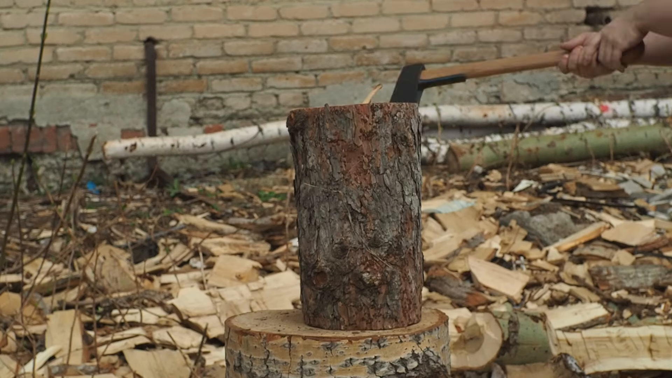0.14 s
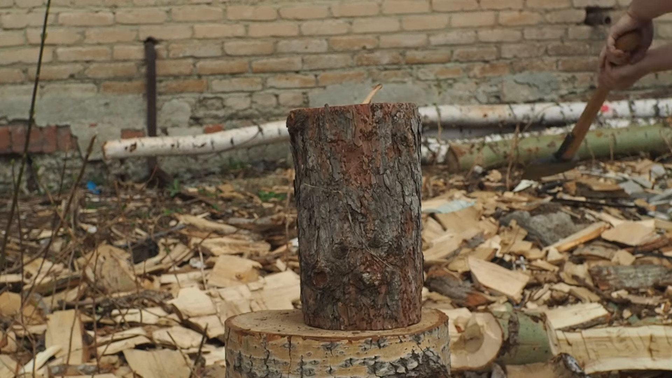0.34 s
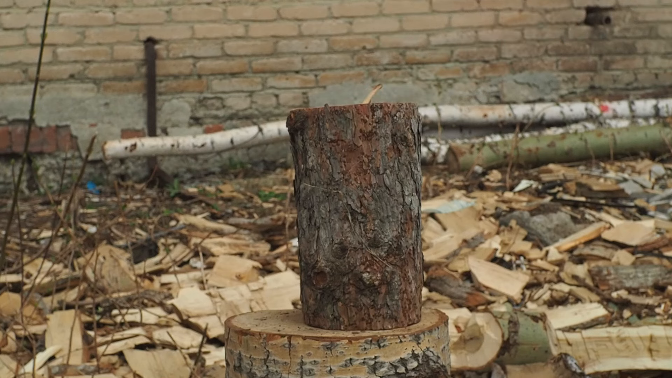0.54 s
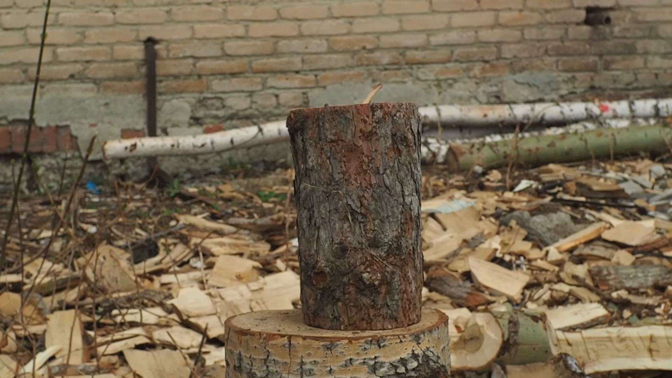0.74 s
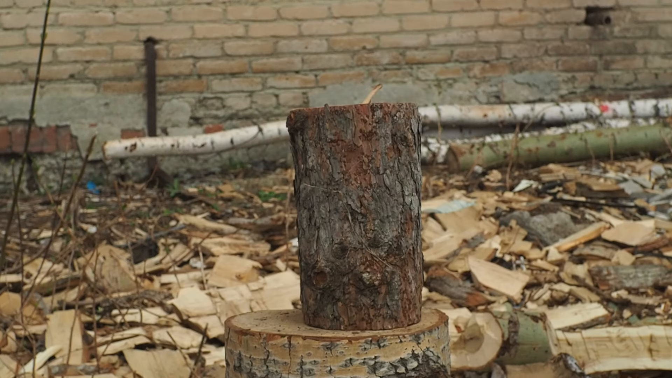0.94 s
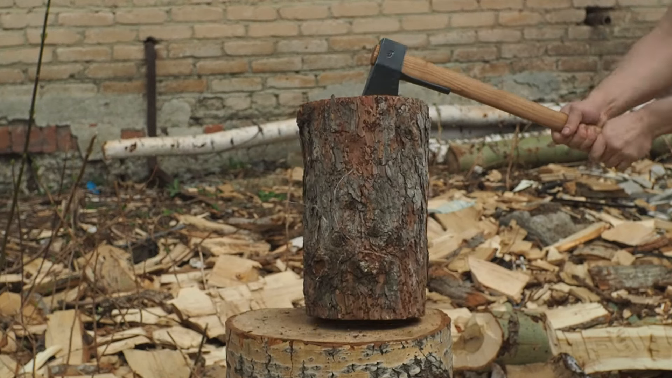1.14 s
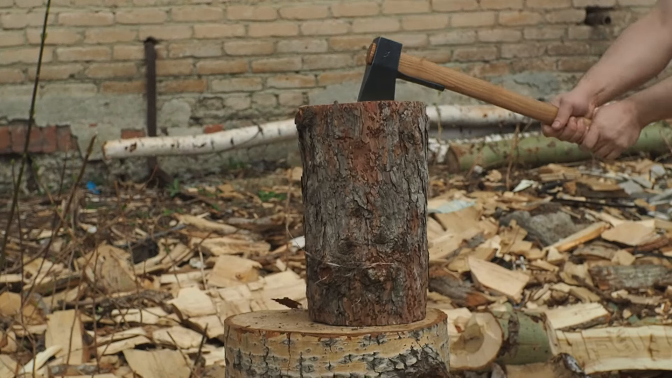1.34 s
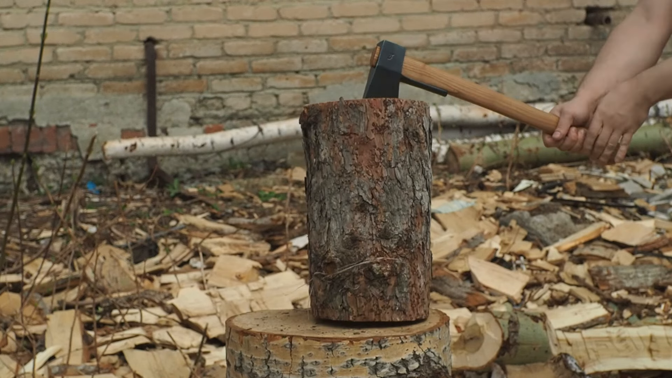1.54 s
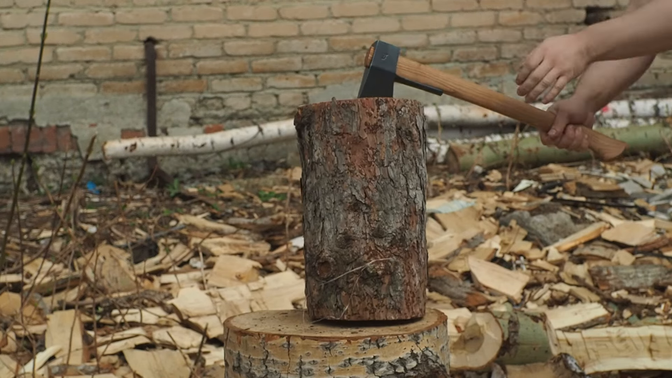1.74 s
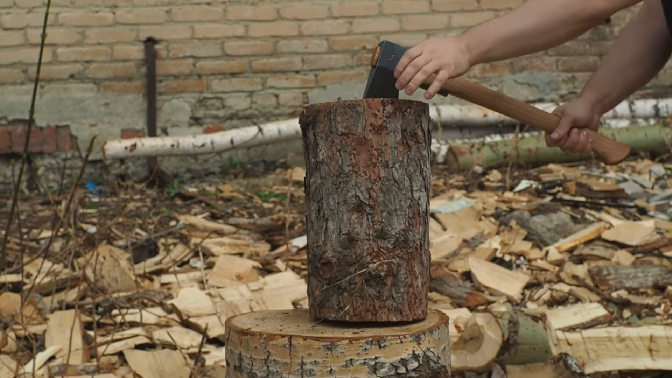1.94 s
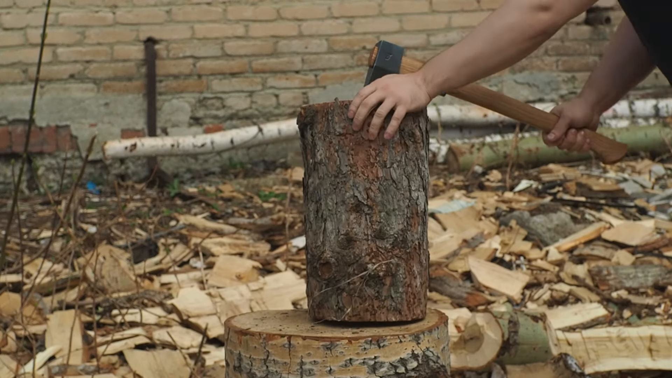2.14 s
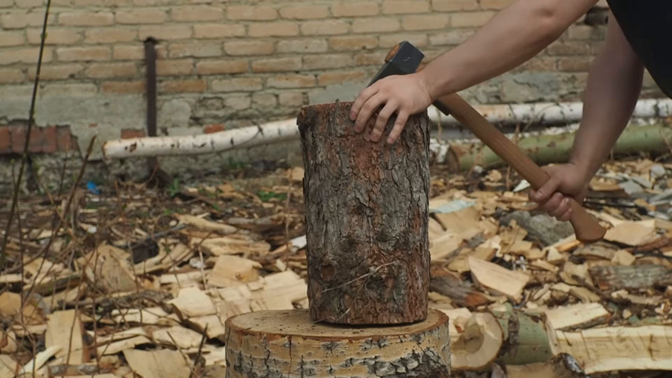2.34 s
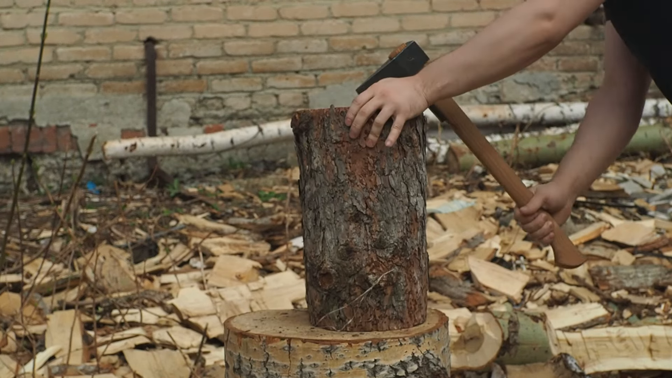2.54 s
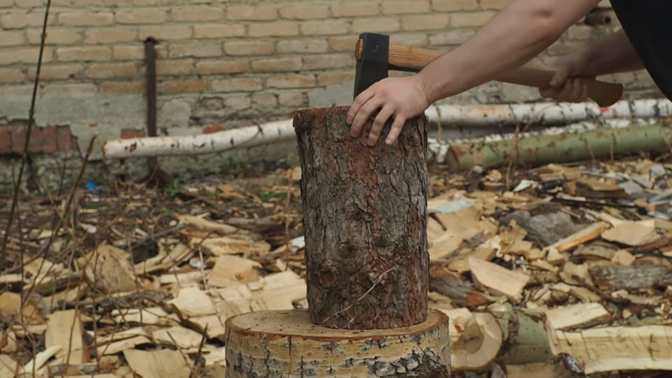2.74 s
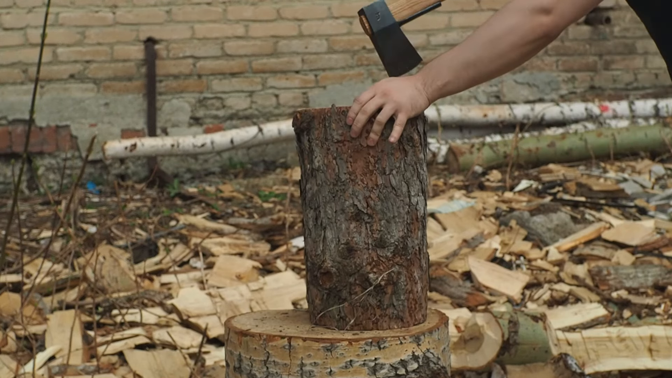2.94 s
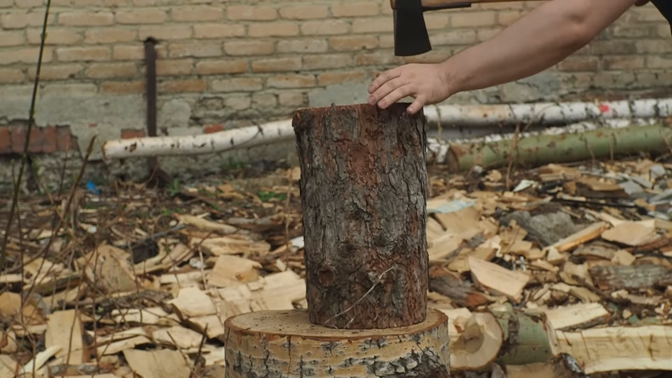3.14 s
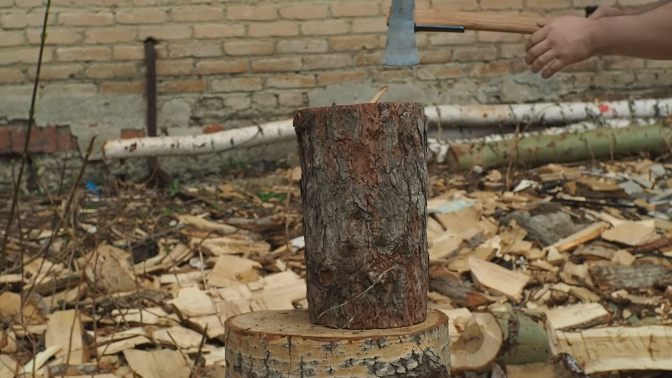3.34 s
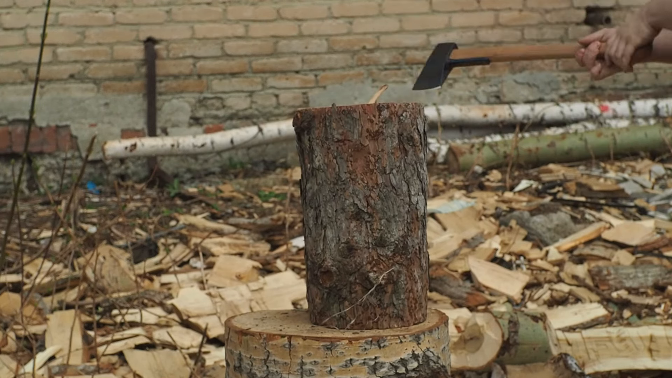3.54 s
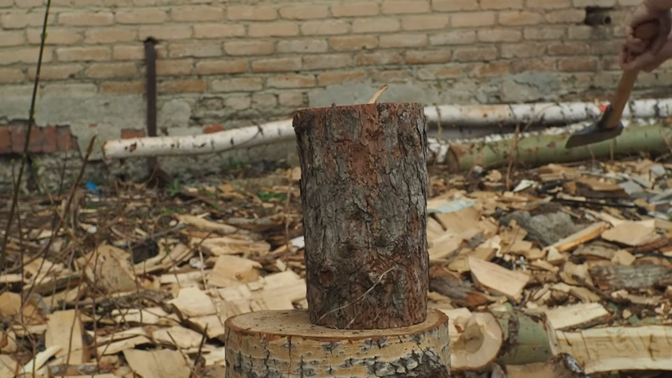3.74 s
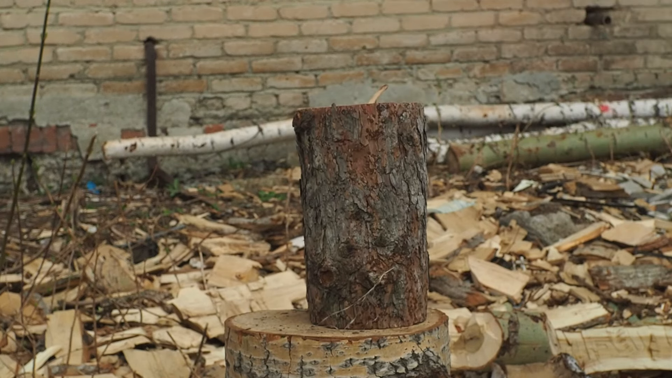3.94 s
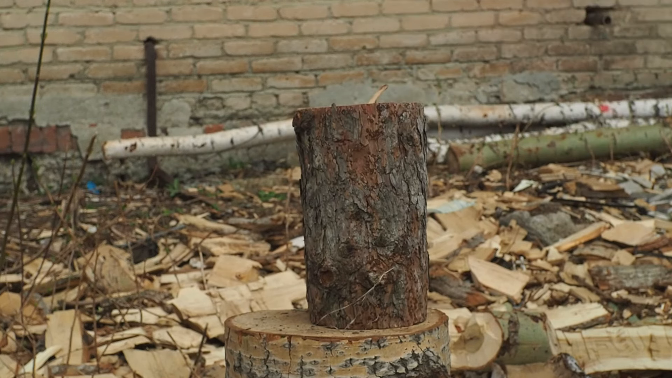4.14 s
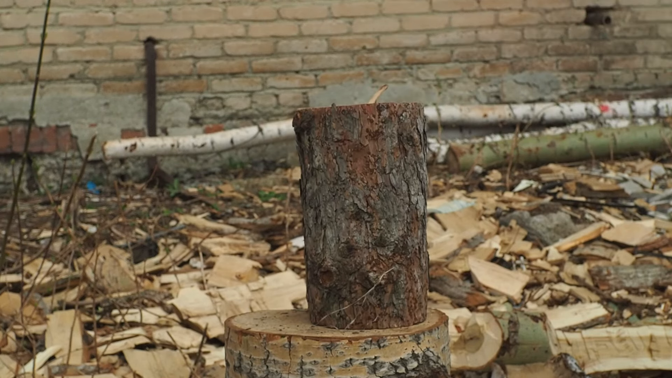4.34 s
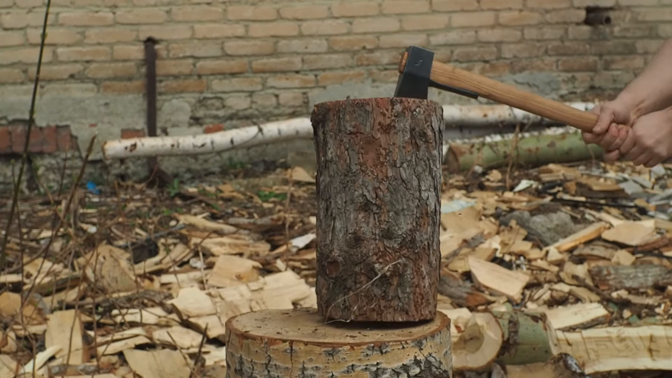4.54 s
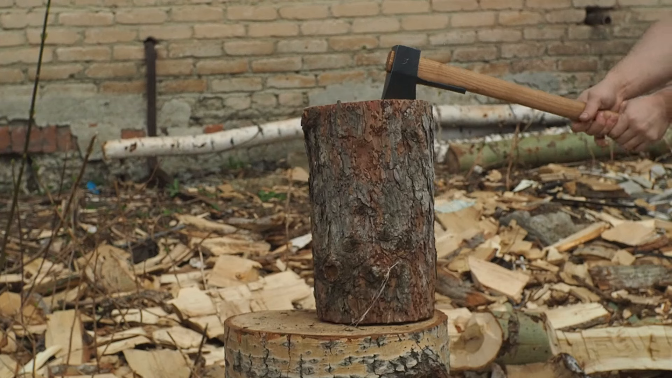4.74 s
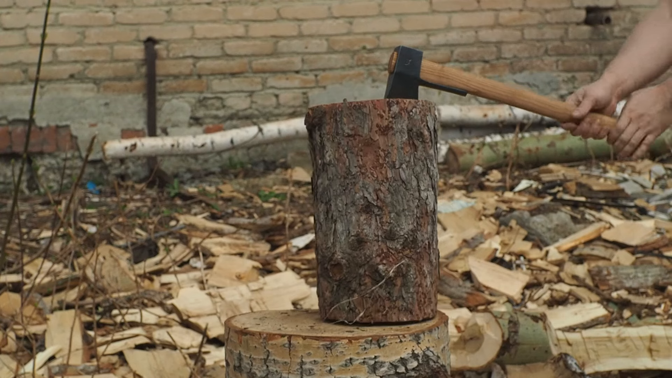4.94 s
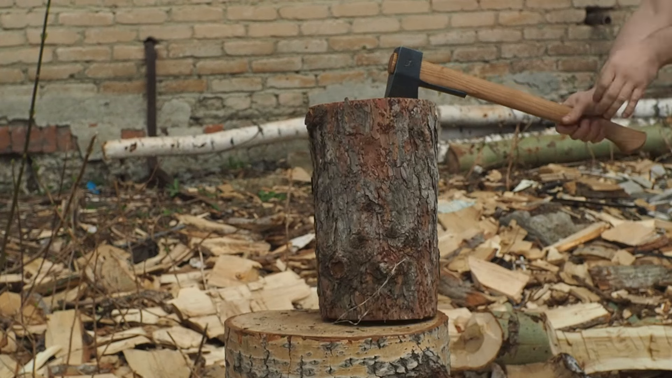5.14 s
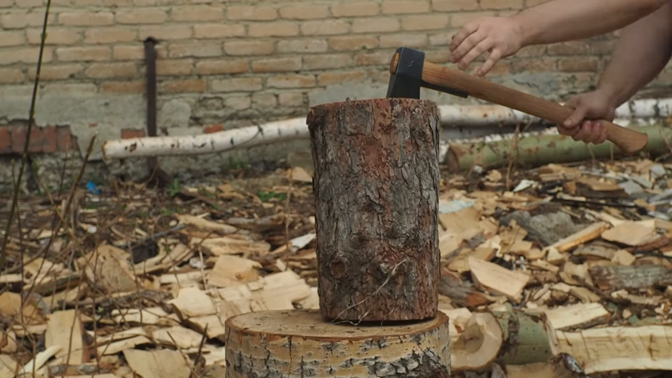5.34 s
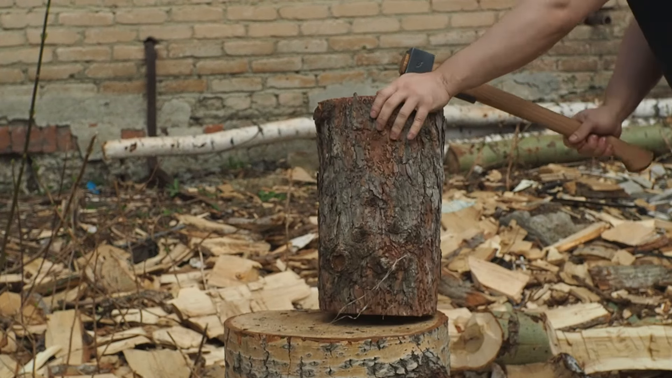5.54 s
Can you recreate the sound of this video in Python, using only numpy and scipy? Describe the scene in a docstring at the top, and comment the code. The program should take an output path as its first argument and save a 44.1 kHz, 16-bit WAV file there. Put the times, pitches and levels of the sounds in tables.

```python
"""A heavy axe bites twice into a log on a chopping block, in a yard between brick walls.
Each blow cracks fibres and makes the log ring; the walls throw the sound to and fro as a quick echo.
In between, boots shuffle on wood chips, hands work the axe loose and the log knocks on the block.
Far away a town rumbles and an engine drones, swelling as it pulls and then easing off."""
import sys
import numpy as np
from scipy import signal
from scipy.fft import rfft, irfft, next_fast_len
from scipy.io import wavfile

SR = 44100
rng = np.random.default_rng(int(sys.argv[2]) if len(sys.argv) > 2 else 0)


def file_out(sig):
    """Save sig as 16-bit WAV at sys.argv[1]."""
    # one column per channel
    cols = np.atleast_2d(sig).T
    # limit, then scale
    lim = np.clip(cols, -1, 1)
    pcm = np.round(lim * 32767).astype(np.int16)
    wavfile.write(sys.argv[1], SR, pcm)


N = 246518
T = np.arange(N) / SR
SHORT, LONG = T[:SR // 4], T[:SR]  # clocks for sounds of a quarter second and of one second

# Axe blows: (time [s], ring gain [dB], crack level [dB], splitting time [s], crack tilt [dB/octave],
# wall echo gain [dB], yard tail gain [dB], far echo gain [dB], its pitch [Hz], its width [octaves])
AXE_BLOWS = [(1.1028, 2, -7, 0.003, -1, 1, 21.5, 18, 960, 0.34),
             (4.481, -1, -7.5, 0.0043, -0.6, 1, 21, 18.5, 1037, 0.18)]
# Notes of the log and axe head; where the axe lands sets their strength. A fade time is a 60 dB fall.
# (pitch [Hz], fade time [s], level in first blow [dB], level in second blow [dB])
LOG_NOTES = [(111.5, 0.095, -27, -20), (157, 0.054, -17.5, -15), (188, 0.058, -21, -12),
             (311, 0.046, -15.5, -15), (397, 0.056, -14, -21), (441, 0.041, -11.5, -10.5),
             (536.4, 0.097, -17, -6.5), (727, 0.059, -31, -19), (813, 0.063, -13, -29),
             (906, 0.065, -14.5, -47), (1060, 0.014, -21.5, -14), (1120, 0.11, -23.5, -42),
             (1385, 0.063, -17.5, -23), (1614, 0.02, -17, -11.5), (1990, 0.03, -40, -10.5),
             (2126, 0.022, -16.5, -17), (2610, 0.03, -14.5, -36), (3000, 0.02, -8.5, -42),
             (3280, 0.047, -14.5, -41), (3660, 0.032, -16, -29), (4260, 0.039, -35, -15.5),
             (4830, 0.065, -34, -21), (6200, .035, -16, -39)]
# Tone of tearing fibres: (frequency [Hz], relative level [dB])
CRACK_TONE = [(100, -17), (500, -11.5), (900, 0), (1700, -6.5), (2500, -5.5), (4000, -3), (7300, -5),
              (9000, -6.5), (11500, -15), (13500, -6.5), (16000, -25)]
# The last fibres snap, once in each blow: (delay [s], level [dB], pitch [Hz])
FIBRE_SNAPS = [(.0008, -2.5, 7000), (.0035, -3, 14000)]
# Echoes between the facing walls: (delay [s], gain [dB], treble cut-off [Hz], boxy ring gain [dB])
WALL_ECHOES = [(.0258, -9, 7900, -6), (.0508, -16, 4500, 13.5), (.0778, -18.5, 4030, -1),
               (.105, -27, 4000, -2)]
# Sound scattered around the yard: (frequency [Hz], gain [dB], fade time [s])
YARD_BANDS = [(104, 0, 0.2), (302, 1.5, 0.57), (550, -5.5, 1), (1000, 3.5, 0.32), (2000, -5.5, 0.63),
              (4000, -5.5, 0.51), (7980, -10.5, 0.3), (14000, -36, 0.13)]
# Light knocks of the handle and loose wood: (time [s], level [dB], pitch [Hz], width [octaves])
WOOD_KNOCKS = [(.057, -24, 720, 0.37), (0.424, -31, 2870, 0.46), (.598, -23.5, 940, .45),
               (.602, -21.5, 2480, 0.59), (1.7, -23, 1810, 0.59), (2.144, -28.5, 1980, 1.05),
               (2.25, -27.5, 1400, 1.5), (2.271, -28, 850, 1.2), (3.401, -32.5, 1040, 1.1),
               (5.283, -30, 910, 0.36), (5.343, -24.5, 1210, 1.4), (5.425, -23.5, 1150, 0.37),
               (5.561, -27.5, 990, 0.6)]
# A boot or hand lands: (time [s], thud level [dB], scuff level [dB], scuff pitch [Hz], fade time [s])
SOFT_LANDINGS = [(.511, -29, -28.5, 1000, .07), (1.898, -25.5, -20.5, 1040, 0.084),
                 (3.8365, -27.5, -20.5, 1990, 0.037), (3.903, -21.5, -28.5, 1400, 0.058)]
# The loudest snaps of dry chips and bark: (time [s], level [dB], pitch [Hz])
LOUD_SNAPS = [(.191, -29, 6000), (0.602, -16.5, 9500), (1.4443, -26, 5750), (1.687, -27, 7200),
              (1.933, -24.5, 4400), (2.379, -25, 10000), (3.105, -25, 8700), (3.892, -23.5, 3870),
              (4.818, -26.5, 7950), (5.23, -29, 7000), (5.246, -25, 7000), (5.2856, -23, 10000)]
# Boots on chips, sleeves and hands on bark: (time [s], rise [s], fall [s], level [dB], tilt [dB/octave])
SHUFFLE_MOVES = [(.16, 0.071, 0.065, -38, 1), (.48, .11, .05, -42, 3.5), (1.31, 0.026, 0.043, -42.5, 0.5),
                 (1.54, 0.04, .045, -42, 3), (1.84, 0.063, 0.062, -37.5, 3), (2.1, 0.13, .13, -37, 2.5),
                 (3.08, .03, 0.022, -49, 3), (3.53, .06, .03, -41.5, 2), (3.88, 0.028, 0.052, -44, 2.5),
                 (4.87, 0.066, .1, -46, 4.5), (5.223, .008, 0.13, -37, 3), (5.51, 0.041, 0.048, -43, 4)]
# Tone of sliding chips: (frequency [Hz], relative level [dB])
CHIP_TONE = [(150, -9), (500, 2.5), (1000, 4.5), (2000, 1), (4000, -2.5), (7000, -9), (11500, -12),
             (14000, -8.5), (16000, -31)]
# Tone of the steady background: the distant town, plus a faint hiss near 13.5 kHz: (frequency [Hz], relative
# level [dB])
TOWN_TONE = [(22, -27), (50, -10), (130, -4), (245, -17.5), (315, -11.5), (420, -16.5), (530, -12.5),
             (620, -19), (1050, -15), (2300, -30), (3800, -29), (6500, -35.5), (12400, -37), (13500, -35)]
# How alike the town sounds on the left and right: (frequency [Hz], likeness [0 to 1])
TOWN_STEREO = [(30, 0.81), (130, 0.87), (290, 0.88), (640, 0.84), (1410, 0.46), (3100, 0), (15000, 0)]
# How much louder the left side is than the right: (frequency [Hz], left minus right [dB])
SIDE_BALANCE = [(25, -1), (60, 1), (200, 1.1), (1000, 1.5), (4400, -0.4), (8100, 4.5), (11000, 0),
                (14000, -8)]

SNAP_HZ = 6900  # typical pitch of a breaking splinter


def axe():
    """Each blow chops and snaps the last fibres; the walls, the yard and a far echo answer."""
    out = np.zeros((2, N))
    for blow, (start, *stroke, walls_db, yard_db, far_db, far_hz, far_octaves) in enumerate(AXE_BLOWS):
        delay, fibre_db, fibre_hz = FIBRE_SNAPS[blow]
        add(out, start, chop(blow, *stroke))
        fibres = burst(hump(fibre_hz, octaves=0.55), fade_s=0.014, likeness=0.3)
        add(out, start + delay, undb(fibre_db) * fibres)
        add(out, start, undb(walls_db) * wall_echoes(blow, stroke))
        add(out, start, undb(yard_db) * yard_tail())
        add(out, start, undb(far_db) * far_echo(far_hz, far_octaves))
    return out


def chop(blow, ring_db, crack_db, split_s, tilt_db, rise_s=0.00026):
    """The blade tears fibres until it sticks; the log rings on."""
    ring = sum((-1) ** k * undb(levels[blow]) * np.sin(2 * np.pi * hz * SHORT) * fade(SHORT, fade_s)
               for k, (hz, fade_s, *levels) in enumerate(LOG_NOTES))
    onset = 1 - np.exp(-SHORT / rise_s)
    tearing = fade(np.maximum(SHORT - split_s, 0), fade_s=0.016)
    crack = unit(colour(stereo_noise(len(SHORT), 0.64), sloped(CRACK_TONE, tilt_db)))
    return undb(ring_db) * ring * onset + undb(crack_db) * crack * tearing


def wall_echoes(blow, stroke, bass_cut_hz=650, boxy_hz=1060):
    """The blow bounces between the walls and comes back thinner, duller and boxier."""
    out = np.zeros((2, SR))
    bass_loss = signal.butter(2, bass_cut_hz, "high", fs=SR, output="sos")
    for delay, db, top_hz, boxy_db in WALL_ECHOES:
        treble_loss = signal.butter(1, top_hz, fs=SR, output="sos")
        echo = signal.sosfilt(np.vstack([bass_loss, treble_loss]), chop(blow, *stroke))
        boxy = signal.lfilter(*signal.iirpeak(boxy_hz, Q=7, fs=SR), echo)
        add(out, delay, undb(db) * (echo + undb(boxy_db) * boxy))
    return out


def yard_tail(rise_s=0.0041):
    """Sound scatters around the yard, and each octave dies away at its own pace."""
    out = np.zeros((2, SR))
    for hz in 125 * 2. ** np.arange(8):
        fade_s = lookup(YARD_BANDS, hz, column=2)
        noise = stereo_noise(SR, likeness=np.clip(1.1 - hz / 3500, 0.15, 0.9))
        band = colour(noise, lambda f: np.sqrt(np.maximum(1 - abs(np.log2(f / hz)), 0)))
        same_energy = np.sqrt(2 * np.log(1000) / fade_s / SR)  # a longer fade adds no energy
        gain = undb(lookup(YARD_BANDS, hz)) * same_energy
        out += gain * band * grains(SR, spread_db=2.4) * fade(LONG, fade_s)
    return out * (1 - np.exp(-LONG / rise_s))


def far_echo(hz, octaves, middle_s=0.25, spread_s=0.12, round_trip_s=0.052):
    """The middle pitches come back late from walls further off, throbbing once per round trip."""
    swell = np.exp(-((LONG - middle_s) / spread_s) ** 2 / 2)
    throb = np.exp(0.39 * np.cos(2 * np.pi * LONG / round_trip_s))
    return colour(stereo_noise(SR, 0.88), hump(hz, octaves)) * unit(swell * throb) / np.sqrt(SR)


def knocks(click_db=-11.5):
    """Wood clicks on wood: a narrow knock rings one clear note, a wide one is a longer scuff."""
    out = np.zeros((2, N))
    for start, db, hz, octaves in WOOD_KNOCKS:
        fade_s = (0.021 + 0.035 * octaves) * (1000 / hz) ** 0.3  # higher pieces die away sooner
        note_gain = undb(-7) * np.exp(-octaves)
        note = note_gain * np.sin(2 * np.pi * hz * SHORT) * fade(SHORT, fade_s)
        body = burst(hump(hz, octaves), fade_s, likeness=0.84)
        click = undb(click_db) * snap(SNAP_HZ)
        add(out, start, undb(db) * (body + note + click))
    return out


def thuds():
    """A soft weight lands on wood: a low thump under a broad scuff."""
    out = np.zeros((2, N))
    for start, thud_db, scuff_db, scuff_hz, fade_s in SOFT_LANDINGS:
        add(out, start, undb(thud_db) * burst(hump(hz=375, octaves=0.49), fade_s, likeness=0.96))
        add(out, start, undb(scuff_db) * burst(hump(scuff_hz, octaves=1.42), fade_s, likeness=0.7))
    return out


def splinters():
    """Dry bark and chips break, in loud single snaps and in little clusters."""
    out = sprinkle(start=1.8, length_s=0.45, db=-36.5, count=4)  # bark ticks under a steadying hand
    for start, db, hz in LOUD_SNAPS:
        add(out, start, undb(db) * snap(hz))
    for start, *_ in AXE_BLOWS:  # crumbs of bark, shaken loose, fall back
        out += sprinkle(start + 0.12, length_s=0.13, db=-31.5, count=4)
    for start, rise, fall, db, _ in SHUFFLE_MOVES:  # trodden chips give way
        out += sprinkle(start + rise / 2, rise / 2 + fall, db + 3.5, count=2)
    return out


def sprinkle(start, length_s, db, count, spread_db=5, spread_octaves=0.49):
    """A few small snaps come at chance moments, each with its own size and pitch."""
    out = np.zeros((2, N))
    for k, (size, pitch) in enumerate(rng.standard_normal((count, 2))):
        moment = start + length_s * (k + rng.random()) / count
        hz = SNAP_HZ * 2 ** (spread_octaves * pitch)
        add(out, moment, undb(db + spread_db * size) * snap(hz))
    return out


def snap(hz):
    """One dry splinter breaks."""
    return burst(hump(hz, octaves=0.72), fade_s=0.013, likeness=0.27)


def shuffles():
    """Chips slide over each other in a dense crackle that swells and dies with each move."""
    out = np.zeros((2, N))
    for start, rise, fall, db, tilt_db in SHUFFLE_MOVES:
        grit = stereo_noise(SR, 0.4) * grains(SR, spread_db=3)
        crackle = unit(colour(grit, sloped(CHIP_TONE, tilt_db)))
        swell = np.minimum(LONG / rise, 1)
        settle = np.exp(-(np.maximum(LONG - rise, 0) / fall) ** 1.01)
        add(out, start, undb(db) * crackle * swell * settle)
    return out


def town(level_db=-43):
    """The far-off town is a steady wash of noise, much alike on both sides in the bass."""
    def wash(sign):
        share = lambda f: np.sqrt(1 + sign * lookup(TOWN_STEREO, f))
        return colour(rng.standard_normal(N), lambda f: sloped(TOWN_TONE)(f) * share(f))

    shared, side = wash(1), wash(-1)
    return undb(level_db) * unit(shared + np.array([side, -side]))


def engine(firing_hz=118.9, pull_at_s=3.63, ease_at_s=3.97):
    """A far-off engine fires with a wavering hum and a rumble, louder as it pulls, softer as it eases."""
    pull = np.exp(-((T - pull_at_s) / 0.43) ** 2)
    eased = (1 + np.tanh((T - ease_at_s) / 0.037)) / 2
    effort_db = -48 + 6 * pull - 11.5 * eased
    speed = 1 + 0.054 * unit(colour(rng.standard_normal(N), hump(hz=5, octaves=1)))
    hum = unit(np.sin(2 * np.pi * np.cumsum(firing_hz * speed) / SR))
    rumble = unit(colour(rng.standard_normal(N), hump(firing_hz, octaves=0.4)))
    return undb(effort_db) * (undb(-5) * hum + undb(-2) * rumble)


def burst(tone, fade_s, likeness):
    """A brief touch on wood: a puff of filtered noise that dies fast and peaks near 1."""
    dying = fade(SHORT, fade_s)
    puff = colour(stereo_noise(len(SHORT), likeness), tone) * dying
    return unit(puff) * np.sqrt(np.mean(dying ** 2)) / 2


def grains(size, spread_db, grain_s=0.003):
    """The loudness of a dense run of grains: most are small, a few stand out."""
    step = int(grain_s * SR)
    strengths = np.minimum(rng.exponential(size=size // step + 1), 4)
    return unit(np.repeat(undb(spread_db * strengths), step)[:size])


def stereo_noise(size, likeness):
    """Left and right hiss: unrelated at likeness 0, the same at 1."""
    shared, side = rng.standard_normal((2, size))
    return np.sqrt((1 + likeness) / 2) * shared + np.sqrt((1 - likeness) / 2) * np.array([side, -side])


def colour(sound, gain):
    """Turn each frequency f of a sound up or down by gain(f)."""
    length = sound.shape[-1]
    size = next_fast_len(length)
    hz = np.maximum(np.fft.rfftfreq(size, 1 / SR), 1)
    return irfft(rfft(sound, size) * gain(hz), size)[..., :length]


def hump(hz, octaves):
    """A bell-shaped gain curve around a pitch."""
    return lambda f: np.exp(-(np.log2(f / hz) / octaves) ** 2 / 2)


def sloped(table, tilt_db=0):
    """A gain curve from a tone table, tilted by tilt_db per octave."""
    return lambda f: undb(lookup(table, f) + tilt_db * np.log2(f))


def lookup(table, hz, column=1):
    """Read between the rows of a table, on a scale of octaves."""
    rows = np.array(table)
    return np.interp(np.log(hz), np.log(rows[:, 0]), rows[:, column])


def fade(t, fade_s):
    """Die away by 60 dB every fade_s seconds."""
    return np.exp(-np.log(1000) * t / fade_s)


def undb(db):
    """Turn decibels into a multiplier."""
    return 10 ** (np.asarray(db) / 20)


def unit(sound):
    """Scale to an average (RMS) level of 1."""
    return sound / np.sqrt(np.mean(sound ** 2))


def add(out, start, sound):
    """Mix a sound in, start seconds from the beginning."""
    first = int(start * SR)
    part = sound[..., :max(out.shape[-1] - first, 0)]
    out[:, first:first + part.shape[-1]] += part


def scene(tail_db=-7):
    """Mix the axe, the small sounds and their tail in the yard, the town and the engine."""
    small = knocks() + thuds() + splinters() + shuffles()
    blows = axe()
    small_tail = signal.fftconvolve(small, yard_tail(), axes=1)[:, :N]
    return blows + small + undb(tail_db) * small_tail + town() + engine()


def record(dry, left_lag_s=0.000028, top_hz=15750):
    """The left side lags a little and each side has its own tone; the blows overload; the top is cut."""
    def one_side(sound, sign):
        lag = lambda f: np.exp(-1j * np.pi * f * sign * left_lag_s)
        return colour(sound, lambda f: undb(sign * lookup(SIDE_BALANCE, f) / 2) * lag(f))

    clipped = np.clip([one_side(dry[0], 1), one_side(dry[1], -1)], -1, 1)
    top_cut = signal.ellip(8, 0.2, 70, top_hz, fs=SR, output="sos")
    return signal.sosfilt(top_cut, clipped)


dry = scene()
out = record(dry)
file_out(out)
```